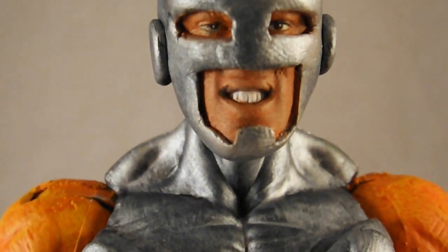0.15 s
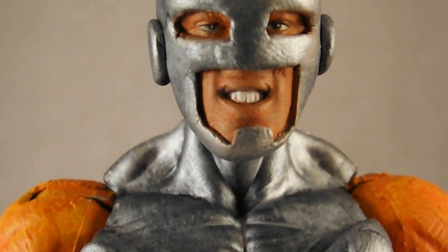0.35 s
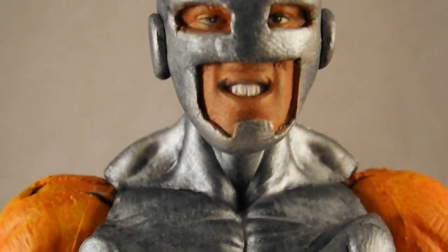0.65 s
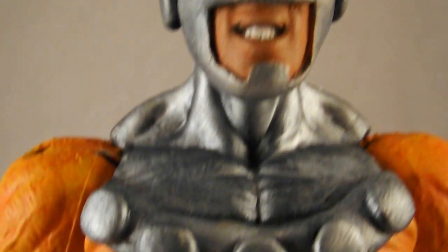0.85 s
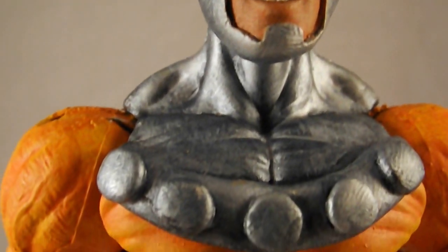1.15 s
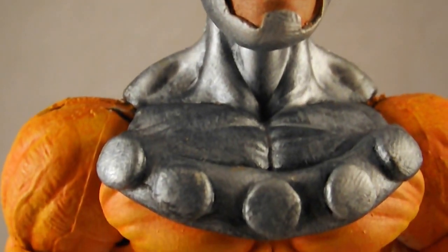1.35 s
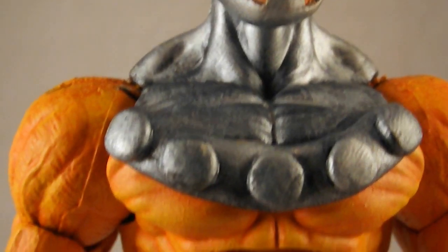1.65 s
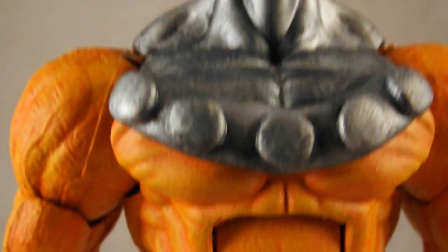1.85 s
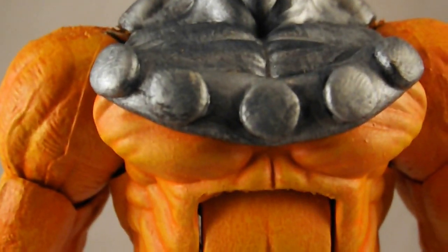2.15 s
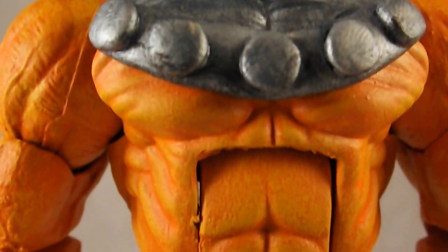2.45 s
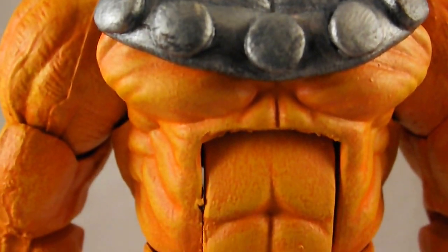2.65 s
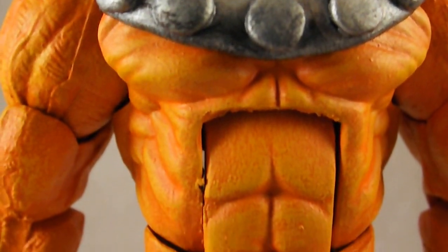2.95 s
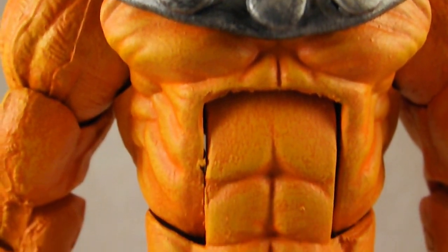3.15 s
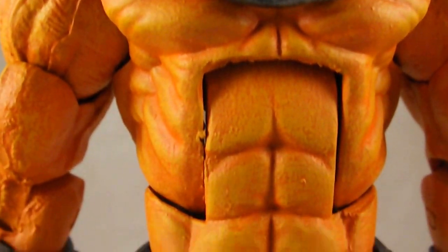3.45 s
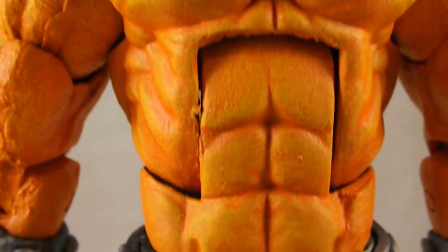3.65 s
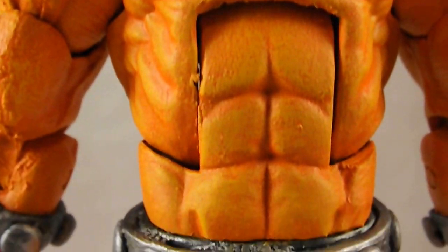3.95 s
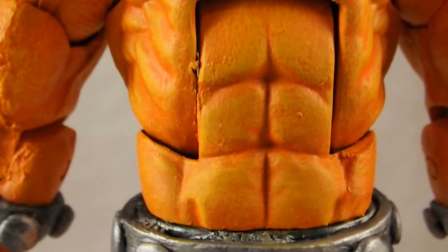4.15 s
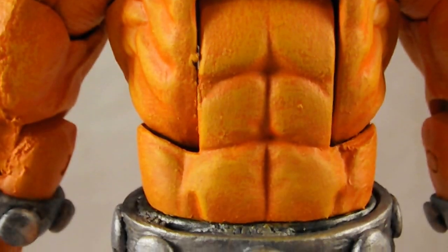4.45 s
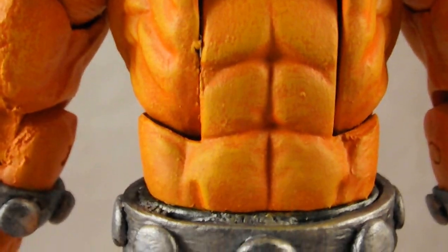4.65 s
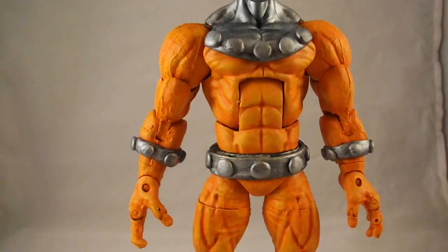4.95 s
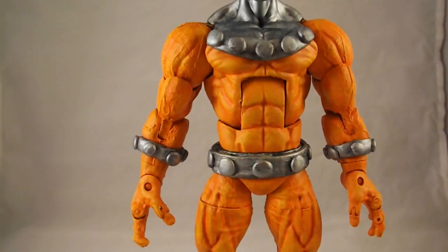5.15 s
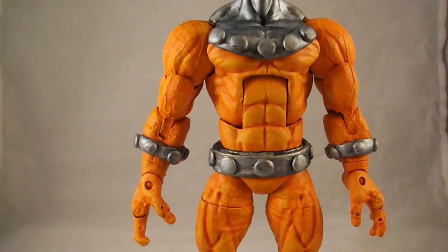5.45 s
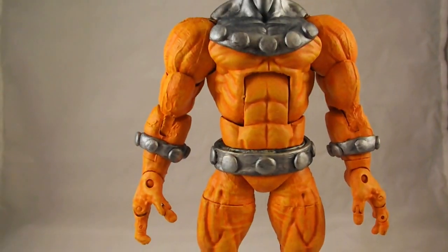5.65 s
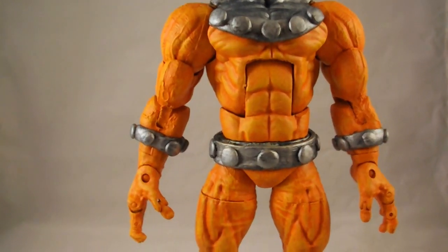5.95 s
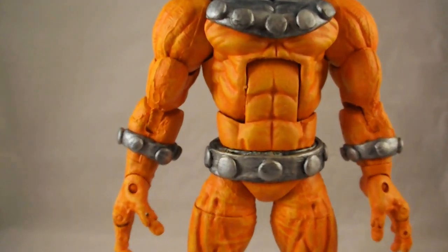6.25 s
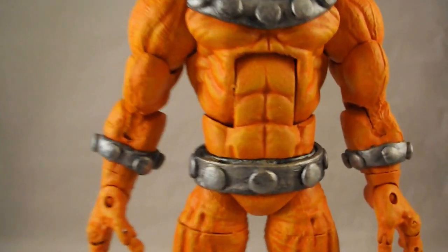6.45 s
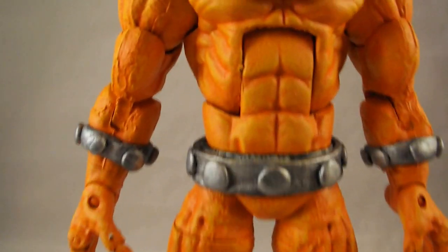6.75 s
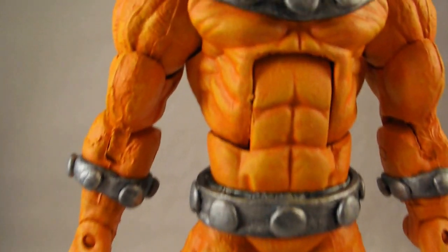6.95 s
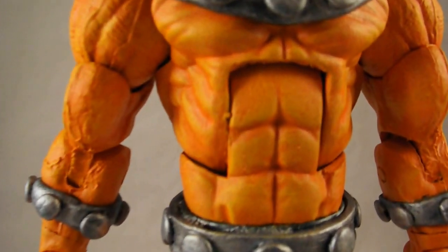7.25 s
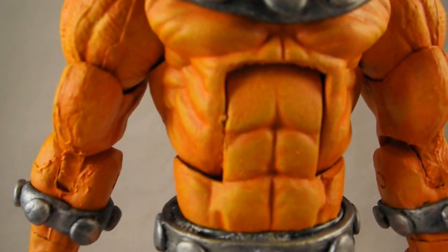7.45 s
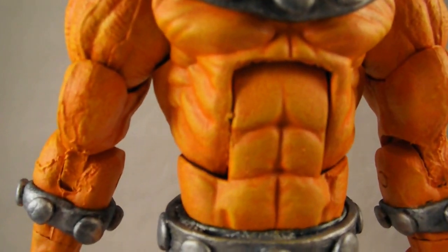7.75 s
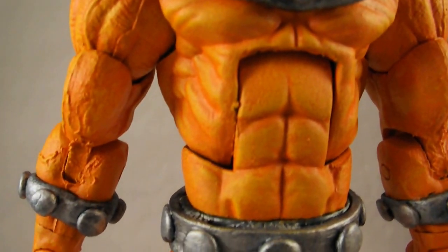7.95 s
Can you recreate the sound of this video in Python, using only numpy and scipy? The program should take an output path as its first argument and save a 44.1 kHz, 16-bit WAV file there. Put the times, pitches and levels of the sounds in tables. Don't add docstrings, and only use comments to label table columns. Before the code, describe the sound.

Steady deep rumble, faint mains hum and hiss lie under a weak, fast electronic buzz and the airy whisper of a zoom drive. Plastic housing ticks and scrapes irregularly under a hand. Short hollow motor ticks, about ten a second, arrive in three bursts. By far the loudest event is a blunt double blow on the camera body just past the middle. Very close, dry, nearly mono sound.

```python
import sys
import numpy as np
from scipy import signal
from scipy.fft import rfft, irfft
from scipy.io import wavfile
from scipy.ndimage import uniform_filter1d

SR = 44100
rng = np.random.default_rng(int(sys.argv[2]) if len(sys.argv) > 2 else 0)


def store_wav(level_fs):
    pcm = np.round(np.clip(np.atleast_2d(level_fs), -1, 1) * 32767)
    wavfile.write(sys.argv[1], SR, pcm.T.astype(np.int16))


def field_ratio(decibels):
    return 10 ** (np.asarray(decibels, dtype=float) / 20)


N = 357651
T = np.arange(N) / SR
HZ = np.arange(N // 2 + 1) * SR / N + 1e-3
GAP_START_S, GAP_END_S = 5.01268, 5.03764
TOP_HZ = 15780


def level(x, db):
    return x * field_ratio(db) / np.sqrt(np.mean(x ** 2))


def coloured(gain):
    return level(irfft(rfft(rng.standard_normal(N)) * gain, N), 0)


def slope(points):
    hz, db = np.transpose(points)
    return field_ratio(np.interp(np.log(HZ), np.log(hz), db))


def peak(hz, width_hz):
    return 1 / (1 + ((HZ - hz) / width_hz) ** 2)


def walk(rate):
    hold = int(SR / rate)
    steps = np.repeat(rng.standard_normal(N // hold + 1), hold)
    return 1.08 * uniform_filter1d(uniform_filter1d(steps, hold), hold)[:N]


def ring(modes, rise_s, chance, in_step_s=0):
    t = T[:SR // 5]
    hz, db, t60 = np.transpose(modes)[:, :, None]
    hz = hz * (1 + 0.004 * chance[:len(modes), None])
    decay_db = db - 60 * np.maximum(t, in_step_s) / t60 + 60 * in_step_s / t60
    swing = field_ratio(decay_db) * np.sin(2 * np.pi * hz * (t - in_step_s))
    out = np.sum(swing, axis=0) * (1 - np.exp(-t / rise_s)) ** 2
    return out / np.abs(out).max()


def crack(t60, rise_s):
    t = T[:SR // 5]
    snap = signal.lfilter([1, .6], [1, -.4], rng.standard_normal(len(t)))
    return snap * field_ratio(-60 * t / t60) * (1 - np.exp(-t / rise_s))


def add(out, s, x):
    i = int(s * SR)
    out[i:i + len(x)] += x[:N - i]


# (time [s], peak level [dB], ring frequency [Hz])
STEPS = [(4.257, -34.5, 1040), (4.361, -34, 1068), (4.454, -33, 1065), (4.555, -33, 1048),
         (4.623, -32.5, 1065), (4.691, -31.5, 1044), (4.76, -32, 1070), (4.801, -37, 1050),
         (4.814, -34, 1042), (5.476, -32.5, 1034), (5.584, -33.5, 1055), (5.675, -31.5, 1038),
         (5.785, -35, 1020), (5.878, -31.5, 1042), (5.979, -33, 1045), (6.083, -31, 1040),
         (6.185, -30, 1044), (6.294, -39, 1070), (7.5455, -30.5, 1045), (7.651, -32.5, 1048),
         (7.742, -30, 1040), (7.853, -37, 1040), (7.945, -31, 1044), (8.048, -30.5, 1045)]
# (ratio to ring frequency [1], level [dB], share of decay time [1])
BARREL_MODES = [(1.0, 2.5, 0.748), (.92, -13.5, 1), (1.1, -11, 0.724), (1.328, -19, 0.7),
                (0.691, -10, 0.45), (0.777, -17, 0.88)]


def focus_motor():
    out = np.zeros(N)
    rasp = coloured(peak(2483, 890))
    for (s, db, hz), chance in zip(STEPS, rng.standard_normal((len(STEPS), 9))):
        t60 = 0.069 + 0.0055 * (db + 34)
        barrel = ring([(hz * r, d, t60 * share) for r, d, share in BARREL_MODES], 0.00402, chance)
        thump_modes = [(203, 10.5, 0.028), (286.6, -4.5, 0.0913), (468, -4, 0.042)]
        thump = ring(thump_modes, 0.0029, 15 * chance[5:])
        t = T[:len(barrel)]
        grit = rasp[int(s * SR) - len(t):int(s * SR)]
        grit = grit * field_ratio(-60 * t / 0.0323) * (1 - np.exp(-t / 0.004))
        add(out, s - .004, field_ratio(db + 3.5) * barrel - field_ratio(-37) * thump + field_ratio(-41) * grit)
    return out


# (time [s], peak level [dB], upper modes over peak [dB], hollow ring over peak [dB],
# ring decay time t60 [s])
KNOCKS = [
    (0.2717, -19, -10.5, -47, 0.027),
    (5.2932, -3, -10, -29, 0.043),
    (5.3464, -11.5, -18.5, -21, 0.039),
]
# (frequency [Hz], level [dB], share of decay time [1])
SHELL_MODES = [(690, -26, .8), (790, -25, .8), (968, -7, .75), (1088, 0, 1.05), (1210, -6, .75),
               (1385, -13, .5), (1550, -14, .3)]
# (frequency [Hz], level [dB], decay time t60 [s])
UPPER_SHELL_MODES = [(1750, -16, .04), (2040, -7, .02), (2250, -6, .018), (2690, -9, .02), (2895, -7, .035),
                     (2800, 4, .006), (3600, -12, .005), (3750, -26, .05)]
# (frequency [Hz], level [dB], decay time t60 [s])
LATCH_MODES = [(5070, -1, .014), (4400, 0, .01), (3500, 0, .012)]


def knocks():
    out = np.zeros(N)
    still = np.zeros(8)
    contact_s = .0017
    for s, db, high_db, hollow_db, t60 in KNOCKS:
        shell_modes = [(hz, d, t60 * share) for hz, d, share in SHELL_MODES]
        shell = ring(shell_modes, 0.0017, still, contact_s)
        top = ring(UPPER_SHELL_MODES, 0.00088, still, contact_s)
        hollow = ring([(395.8, -7.5, 0.13), (340, -4, 0.025), (476, 5, 0.013)], 0.00074, still)
        body = shell + field_ratio(high_db + 6.0) * top + field_ratio(hollow_db + 6.0) * hollow
        add(out, s - .0003, field_ratio(db) * body)
        slap = signal.lfilter([1, -.7], [1], crack(.002, 0.0002))
        slap_db = db - 8 + 1.5 * db
        add(out, s + contact_s - .0006, field_ratio(slap_db) * slap)
    add(out, 5.3672, field_ratio(-37) * ring(LATCH_MODES, .0006, still))
    return out


# (time [s], peak level [dB], upper modes over peak [dB],
# crack over peak [dB], scrape over peak [dB])
TICKS = [(0.979, -29.5, 6.5, -9, -14.5), (1.135, -42, 1, -11, -25), (1.599, -27.5, 11, -9, -12.5),
         (1.646, -49.5, 6, -6, -3), (2.915, -45, 9.5, -11, -13), (3.083, -43, -5, -11, -6.5),
         (3.237, -32, 3.5, -14, -18), (3.293, -38.5, 2, -10, -6), (3.314, -38, -16, -20, -25),
         (3.431, -37.5, 2.5, -11, -28), (3.733, -31.5, 2, -10, -11.5), (3.749, -41.5, 6, -10, -10),
         (3.766, -47, -3, -10, -17), (3.93, -43, 5, -9, -20), (4.779, -26, -1, -14, -28),
         (4.901, -25, 0, -20, -17), (4.922, -43, -5, -16, -6), (5.375, -35.5, 7, -30, -24),
         (5.783, -41, 1, -14, -12), (6.575, -48.5, 8.5, -3, -12), (6.889, -51.5, 1, 0, -10),
         (8.077, -42, -15, -17, -10)]
# (frequency [Hz], level [dB], decay time t60 [s])
TICK_MODES = [(2160, -7.5, 0.016), (2304, -4, 0.013), (2895, -1.5, 0.018), (2800, -8, 0.019),
              (3076, 3.5, 0.0054), (3650, -3, 0.0091), (1630, 3, 0.0046)]


def housing_ticks():
    out = np.zeros(N)
    scrape_gain = peak(2866, 350) ** 2 + 0.72 * peak(1160, 360) ** 2 + 0.23 * peak(4030, 430) ** 2
    scrape = coloured(scrape_gain) * field_ratio(3.0 * walk(200))
    t = T[:SR // 5]
    for (s, db, high_db, crack_db, scrape_db), chance in zip(TICKS, rng.standard_normal((len(TICKS), 14))):
        lower = ring([(968, 0, .032)], 0.0011, chance)
        upper = ring([(1088, 0, .032)], 0.0011, chance[1:])
        flank = ring([(1260, 5, 0.038), (1440, 0, 0.02)], 0.00091, 5 * chance[5:])
        thump_modes = [(200, -2.0, 0.016), (357, -1, 0.016), (518, 4, 0.0051)]
        thump = ring(thump_modes, 0.00071, 15 * chance[2:])
        high = ring(TICK_MODES, 0.00016, 4 * chance[7:])
        tail = np.roll(scrape, -int(s * SR))[:len(t)]
        tail = tail * np.exp(-(t / .028) ** 2) * (1 - np.exp(-t / 0.0029))
        body = 0.58 * (upper - lower) + 0.22 * flank + field_ratio(-4) * thump + field_ratio(high_db) * high
        snap = field_ratio(crack_db) * crack(0.0048, 0.000067)
        add(out, s - .0005, field_ratio(db) * (body + snap + field_ratio(scrape_db) * tail))
    return out


# (time [s], housing ring level [dB])
GRIP = [(0.0, -58), (0.54, -59.5), (0.97, -55), (1.35, -58.5), (1.76, -55), (2.21, -58), (3.16, -56.5),
        (4.04, -58), (4.83, -54), (4.95, -57), (5.89, -59), (6.03, -55), (6.91, -60.5), (8.11, -57)]
# (frequency [Hz], width [Hz], level [dB])
HOUSING_PEAKS = [(970, 59, -6.5), (1070, 40, -1.5), (1194, 82, -7), (1336, 210, -5.5)]
# (frequency [Hz], width [Hz], level [dB])
DRIVE_PEAKS = [(2010, 554, -4.5), (2690, 220, -1), (3205, 260, -3.5), (3700, 186, -2), (4260, 277, -4)]


def zoom_drive():
    grip_db = np.interp(T, *np.transpose(GRIP))
    strain_db = 4.5 * np.exp(-((T - 6.94) / 0.3) ** 2)
    drive_db = -58.5 + 0.137 * (grip_db - grip_db.mean()) + strain_db
    stir = walk(25)
    rung = sum(field_ratio(db + 0.86 * stir + 2.9 * walk(18)) * coloured(peak(hz, w)) for hz, w, db in HOUSING_PEAKS)
    drive = sum(field_ratio(db + 1.0 * stir + 1.2 * walk(27)) * coloured(peak(hz, w)) for hz, w, db in DRIVE_PEAKS)
    return field_ratio(grip_db) * level(rung, -0.67) + field_ratio(drive_db) * level(drive, 0)


def sensor_buzz():
    spikes = np.zeros(N)
    frame_hz, spike_hz = 29.513, 1850
    # first read-out [s], end [s], spike peak [dB]
    for first, end, db in ((.0064, GAP_START_S, -41), (5.0574, T[-1] - .01, -40)):
        frames = np.arange(first, end, 1 / frame_hz)
        at = ((frames[:, None] + np.arange(4) / spike_hz) * SR).astype(int)
        sizes = np.array([1.0, 0.36, 0.96, 0.18])
        spikes[at] = field_ratio(db + 2.18 * rng.standard_normal(at.shape)) * sizes
    return irfft(rfft(spikes) * np.clip(HZ / 4000, 0, 1), N)


# (frequency [Hz], level per Hz [dB])
RUMBLE = [(7.1, -19), (12, 1), (49, -6.5), (63, -9), (81, -17.5), (128, -23), (151, -22.5), (236, -26),
          (371, -37.5), (392, -37), (900, -45.5), (1170, -69), (1980, -120)]


def ventilation():
    gust_db = -42 + 1.5 * walk(3.94)
    share = np.clip(np.log2(HZ / 70), 0, 1)
    flow = rfft(rng.standard_normal(N)) * slope(RUMBLE)
    deep = irfft(flow * (1 - share), N)
    air = irfft(flow * share, N)
    hum = field_ratio(-53) * coloured(peak(120, 9))
    return field_ratio(gust_db) * level(deep, 3.7) + level(air, -53.5) + hum


# (frequency [Hz], level per Hz [dB])
HISS = [(180, -43), (300, -3), (1060, -8), (1660, -11.5), (3710, -15), (4850, -16), (15200, -20.5),
        (16500, -40)]


def amplifier_hiss():
    return field_ratio(-57.5) * coloured(slope(HISS))


def scene():
    mono = focus_motor() + knocks() + housing_ticks() + zoom_drive()
    mono = mono + sensor_buzz() + ventilation() + amplifier_hiss()
    return np.array([mono, mono])


# (low edge [Hz], high edge [Hz], drop-out threshold [spreads])
SIDE_DROPS = [(300, 1300, 1.0), (1300, 1900, 1.2), (1900, 2600, .6), (2600, 3400, -.4), (4600, 5700, -.6),
              (5700, 7000, -1.2)]


def thin_side(side):
    for low_hz, high_hz, odds in SIDE_DROPS:
        band = irfft(rfft(side) * ((HZ > low_hz) & (HZ < high_hz)), N)
        power = band ** 2
        faint = uniform_filter1d(power, SR // 40) < 6 * np.median(power)
        dropped = 1. * (faint & (walk(30) < odds))
        side = side - band * uniform_filter1d(dropped, SR // 200)
    return side


def band_limit(x):
    return signal.sosfilt(signal.butter(12, 16820, fs=SR, output="sos"), x)


def record(dry):
    mono = rfft(dry[0]) * np.where(HZ < TOP_HZ, 1, field_ratio(-32))
    lag = np.exp(-2j * np.pi * HZ * 1.0 / SR)
    first_shot = T < GAP_START_S
    mid = np.where(first_shot, irfft(mono * (1 + lag) / 2, N), irfft(mono, N))
    treble = irfft(mono * (lag - 1) / 2 / (1 + (700 / HZ) ** 4), N)
    noise = field_ratio(-72.0) * coloured(slope([(1000, -30), (3500, 0), (TOP_HZ, -2), (16000, -60)]))
    side = np.where(first_shot, thin_side(treble + noise), 0)
    gap = (T >= GAP_START_S) & (T < GAP_END_S)
    gap_noise = field_ratio(-78.5) * rng.standard_normal((2, N))
    mix = np.where(gap, gap_noise, np.array([mid + side, mid - side]))
    return band_limit(mix)


dry = scene()
out = record(dry)
store_wav(out)
```